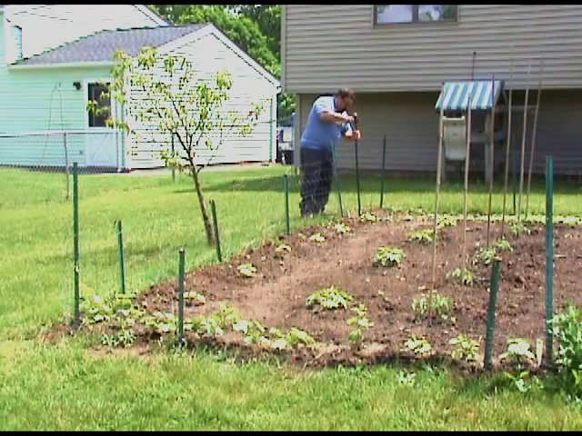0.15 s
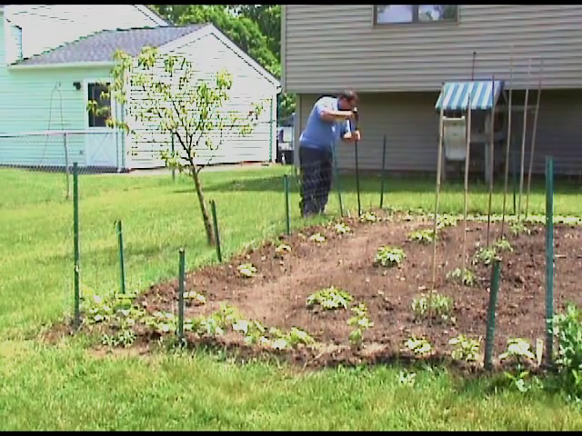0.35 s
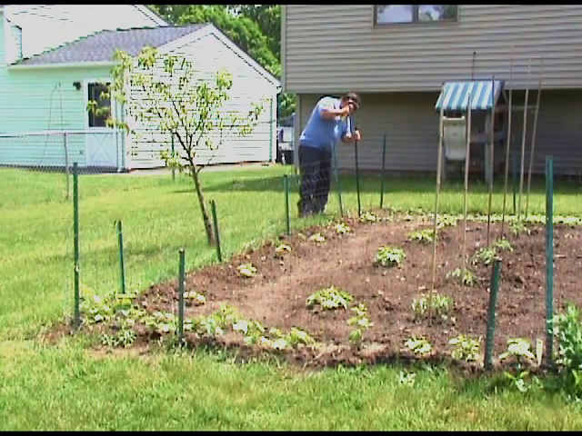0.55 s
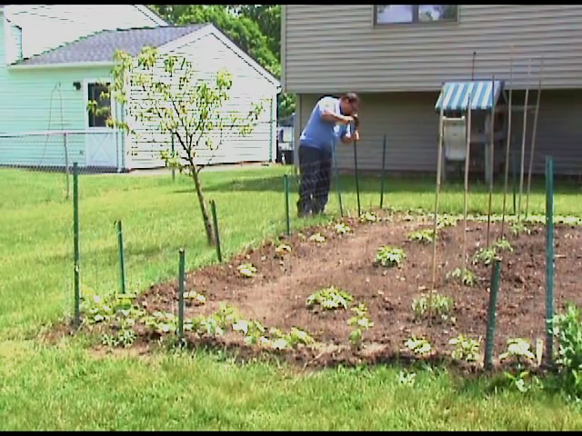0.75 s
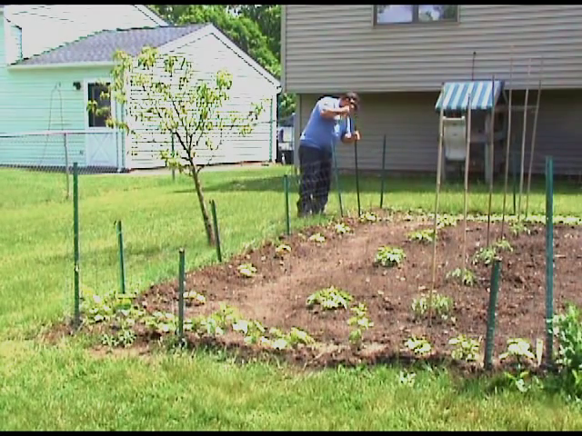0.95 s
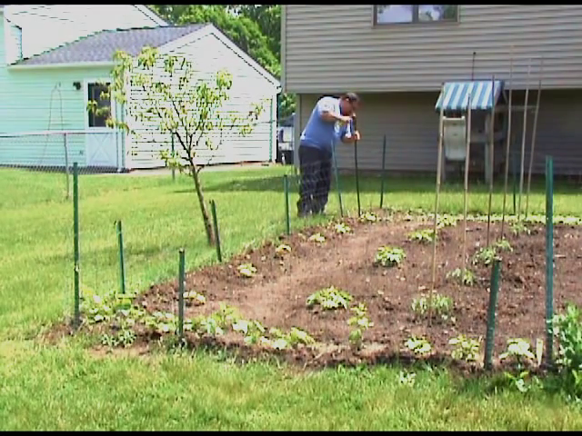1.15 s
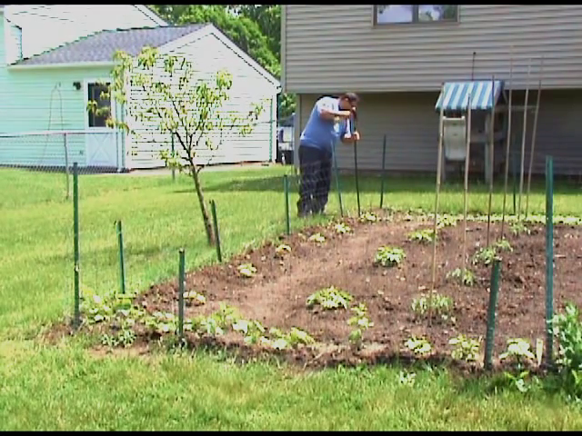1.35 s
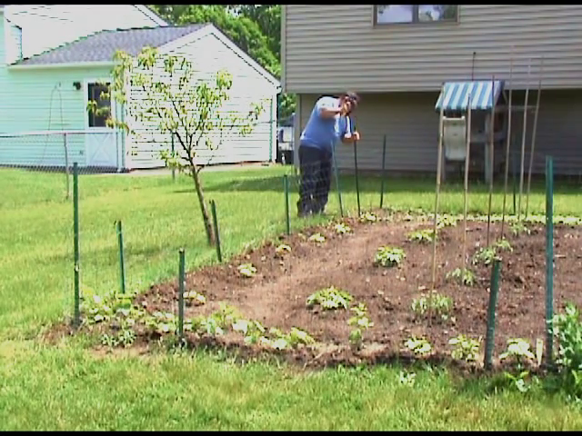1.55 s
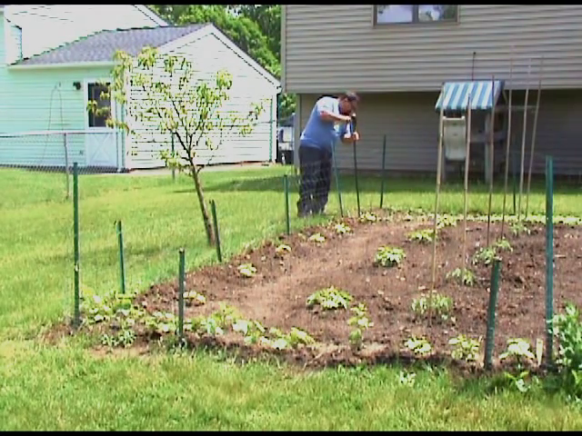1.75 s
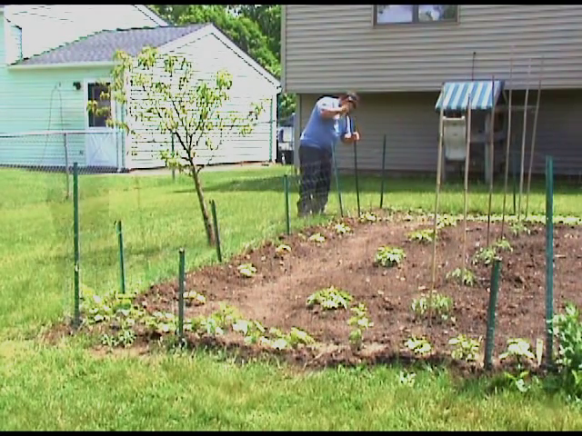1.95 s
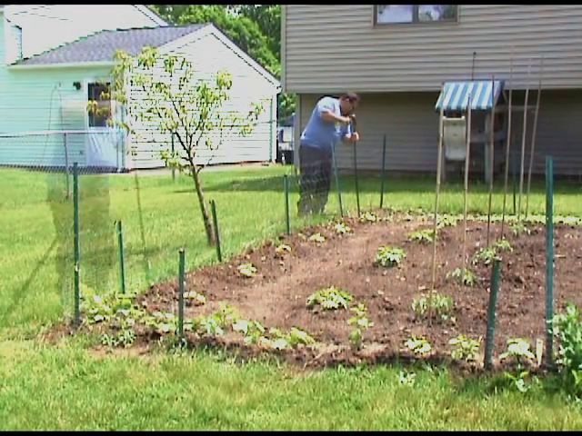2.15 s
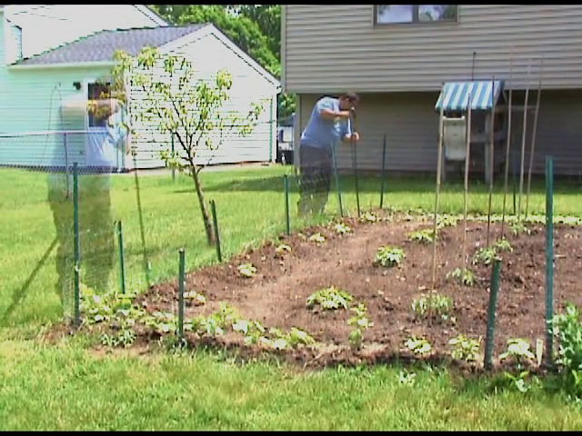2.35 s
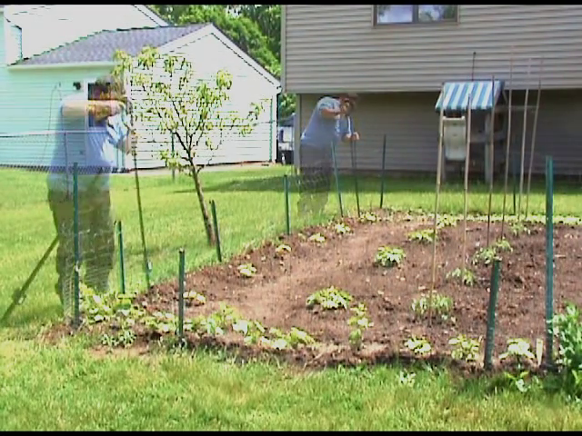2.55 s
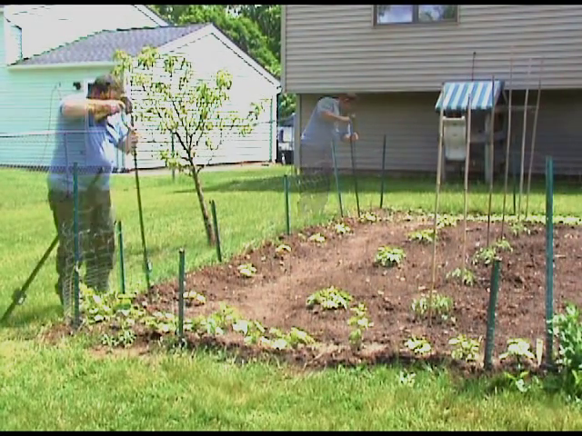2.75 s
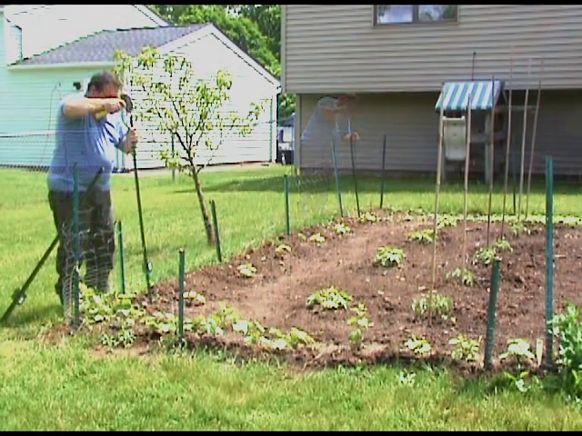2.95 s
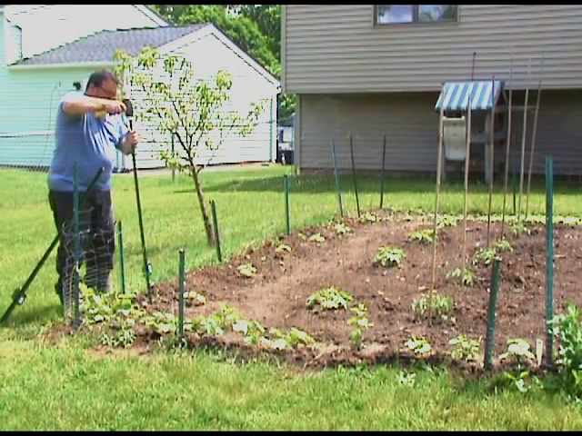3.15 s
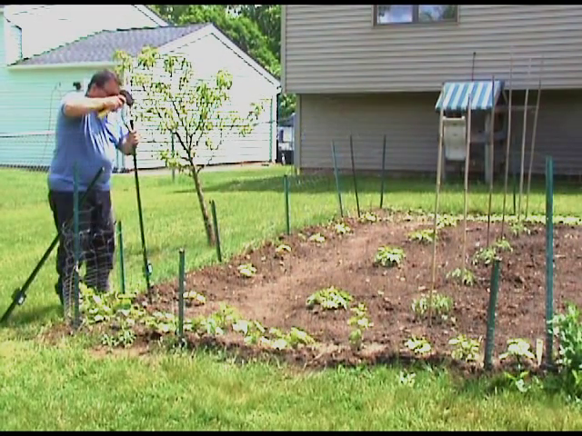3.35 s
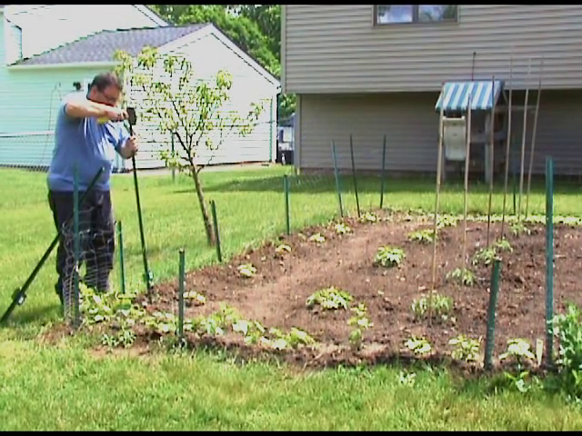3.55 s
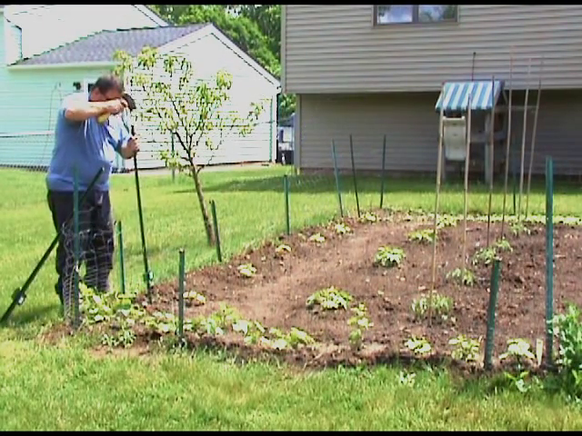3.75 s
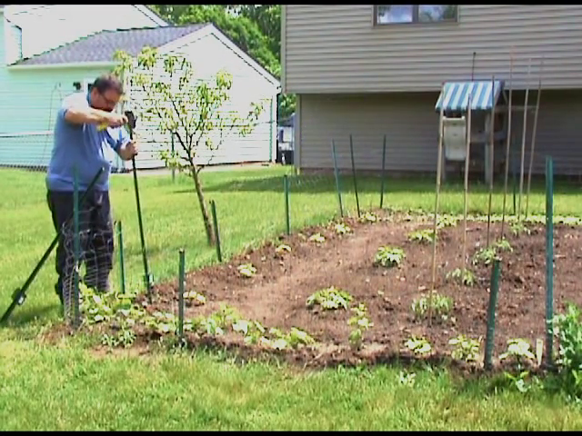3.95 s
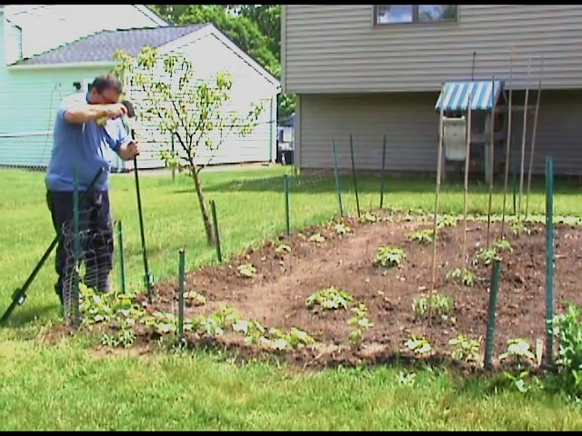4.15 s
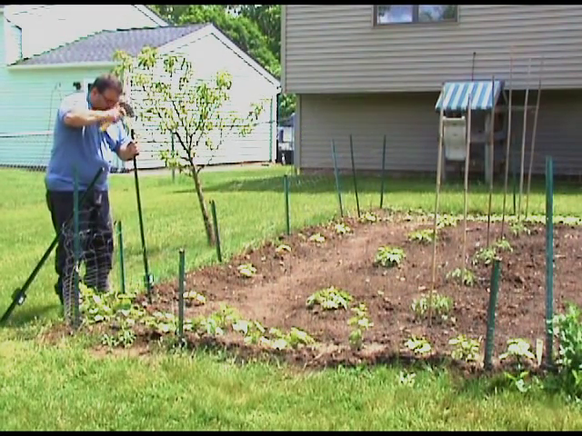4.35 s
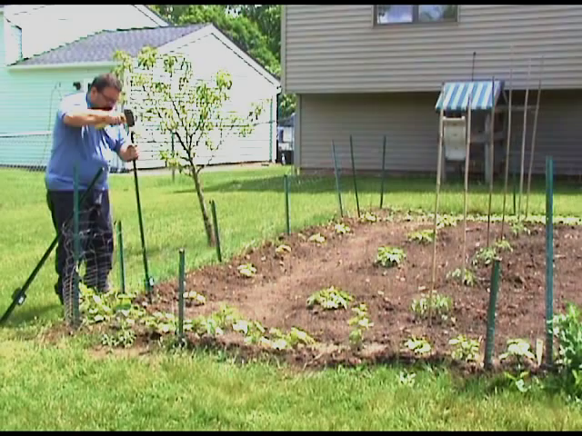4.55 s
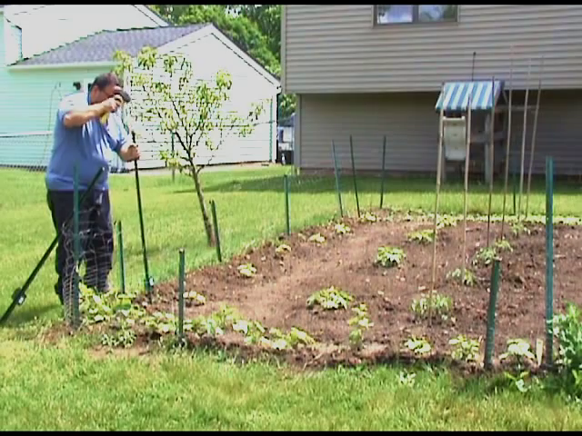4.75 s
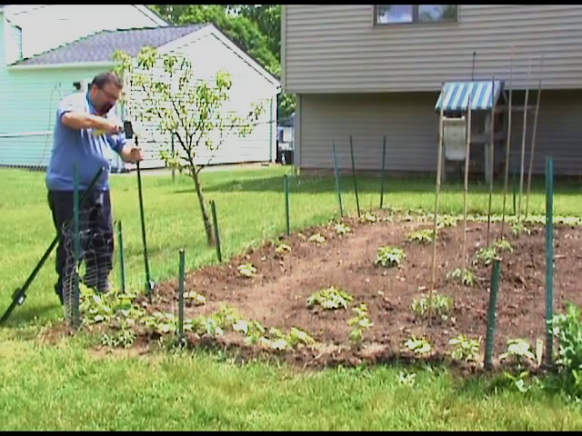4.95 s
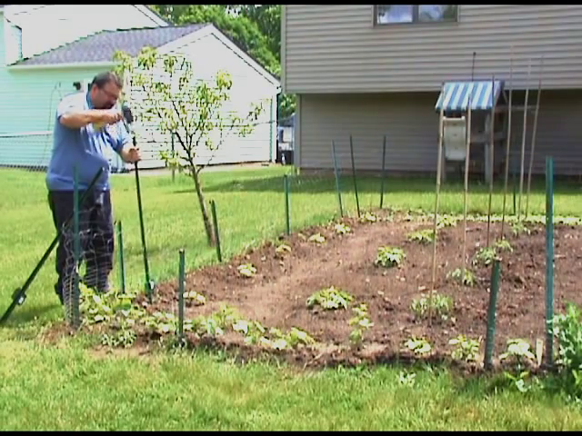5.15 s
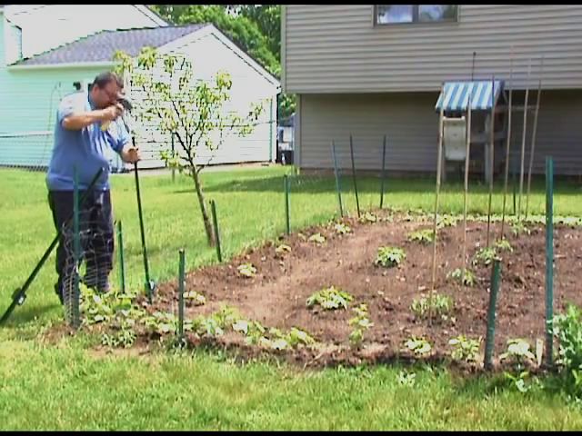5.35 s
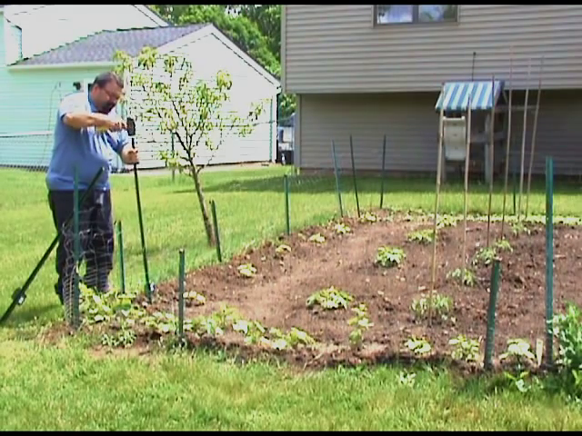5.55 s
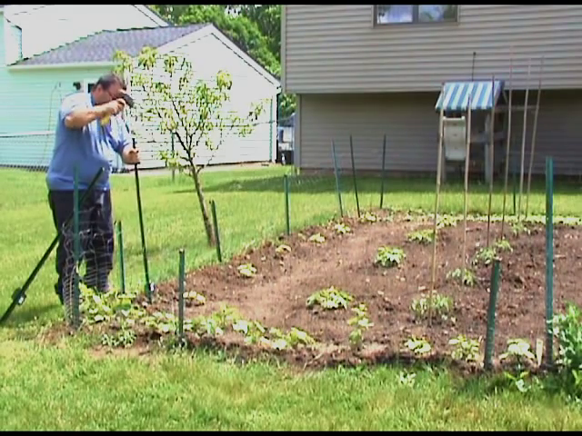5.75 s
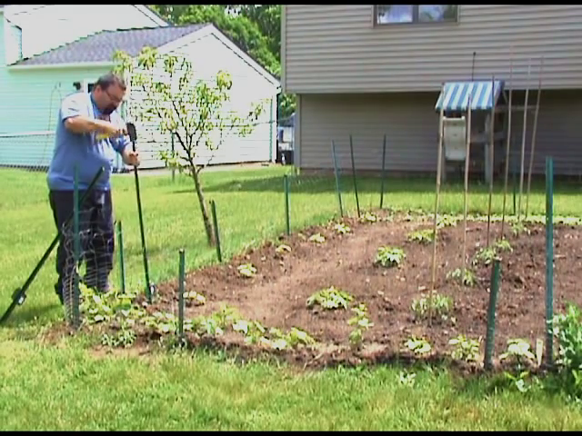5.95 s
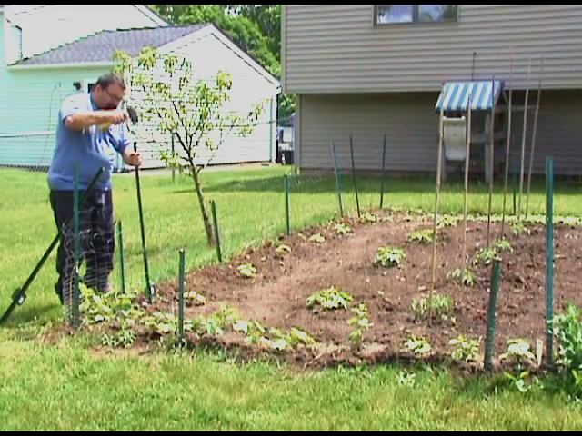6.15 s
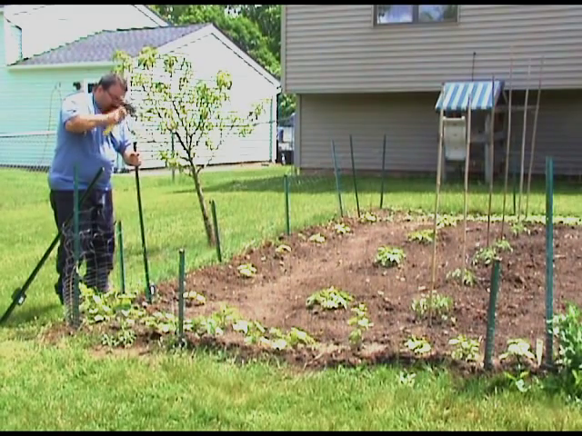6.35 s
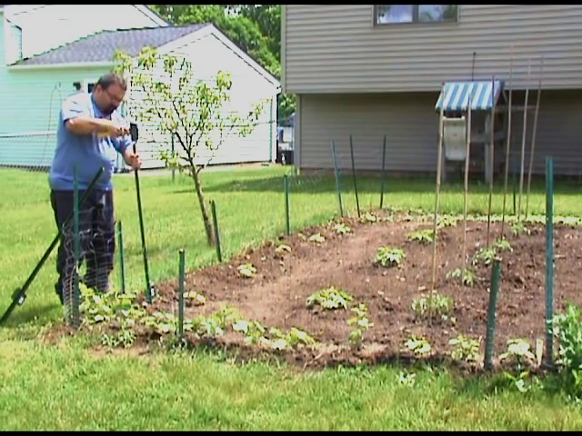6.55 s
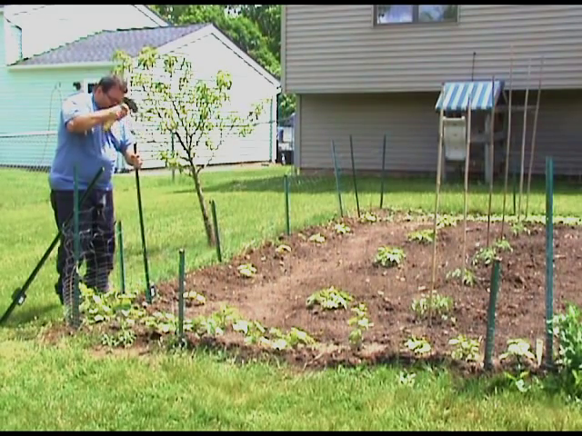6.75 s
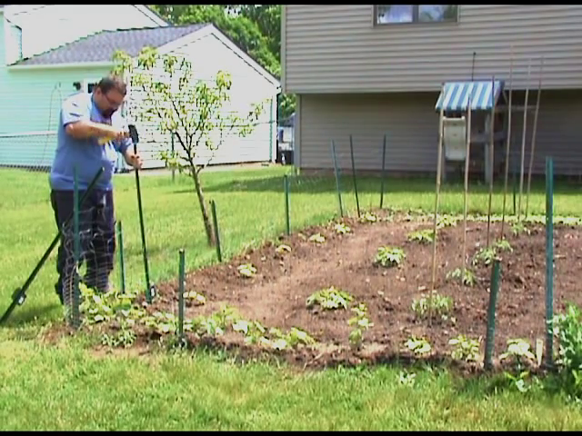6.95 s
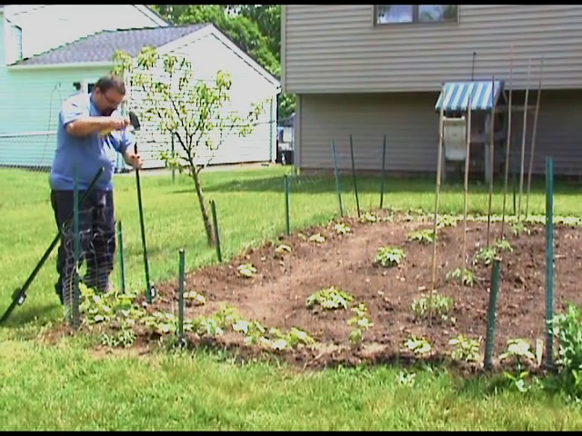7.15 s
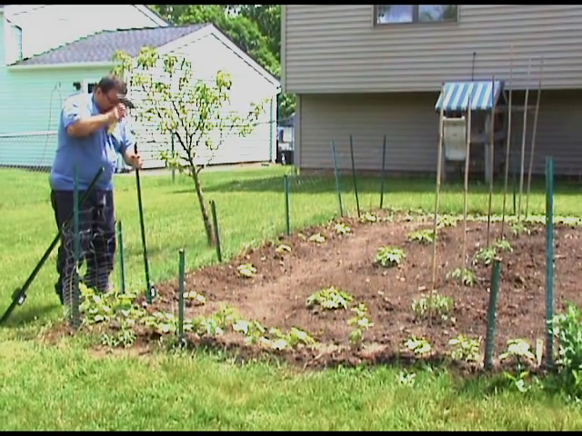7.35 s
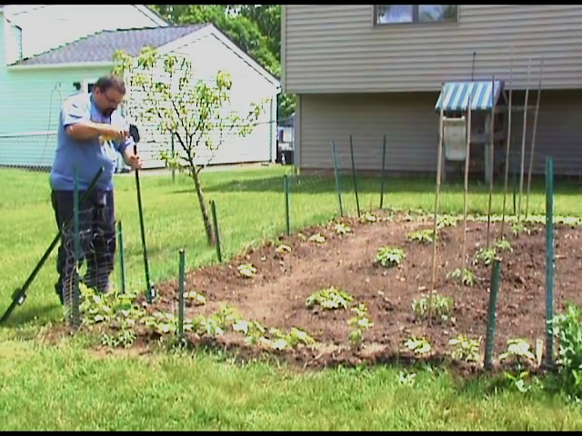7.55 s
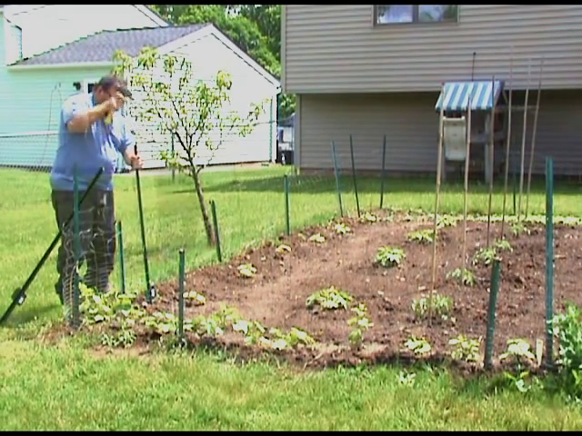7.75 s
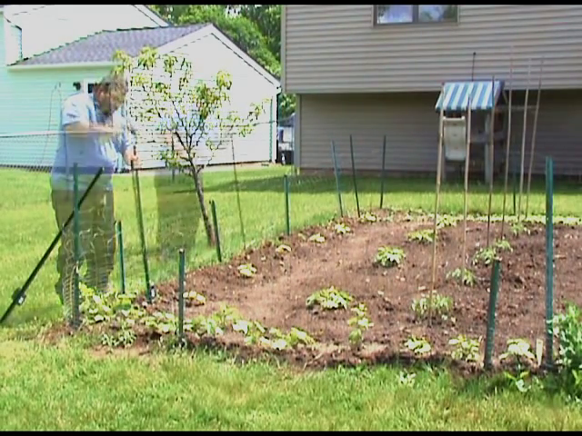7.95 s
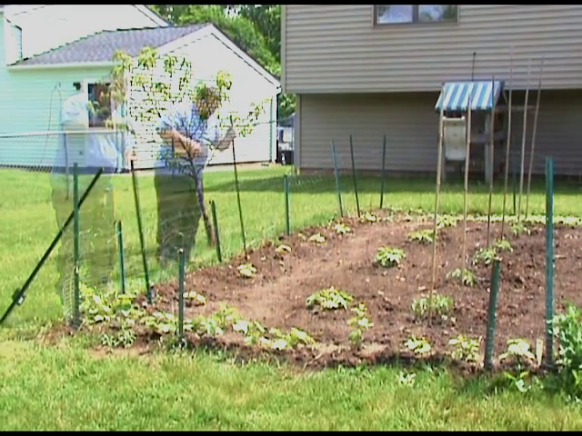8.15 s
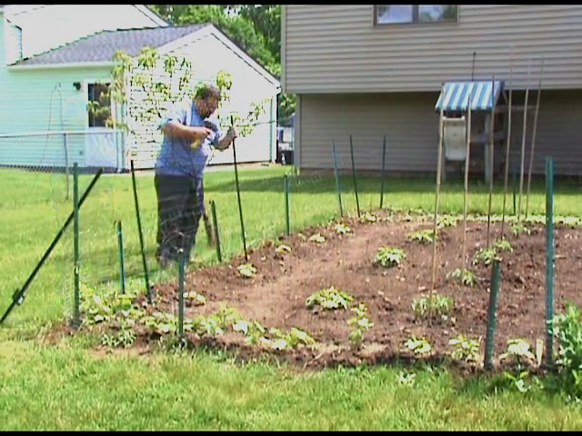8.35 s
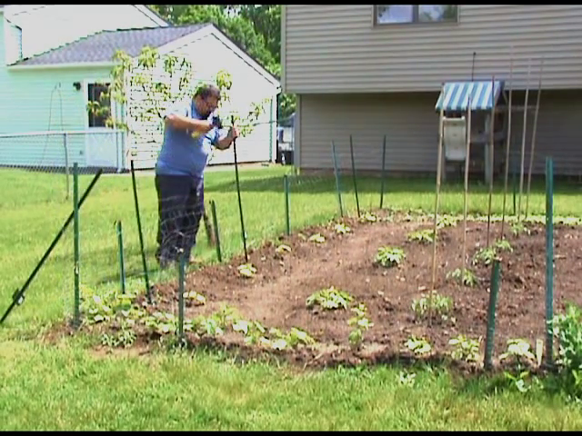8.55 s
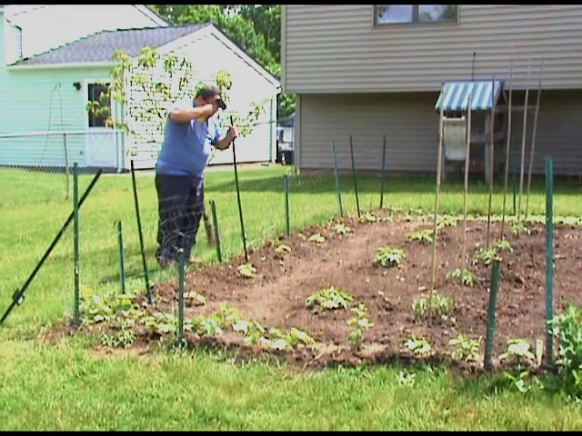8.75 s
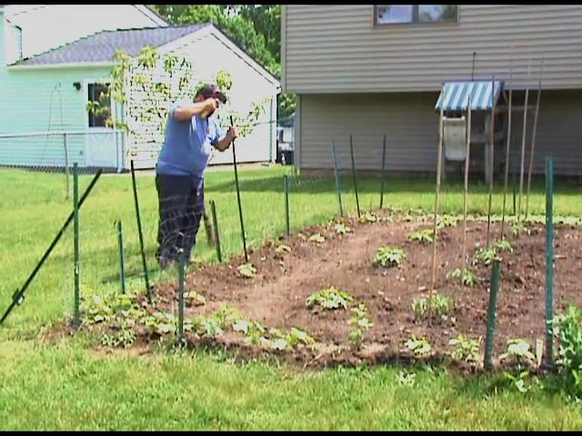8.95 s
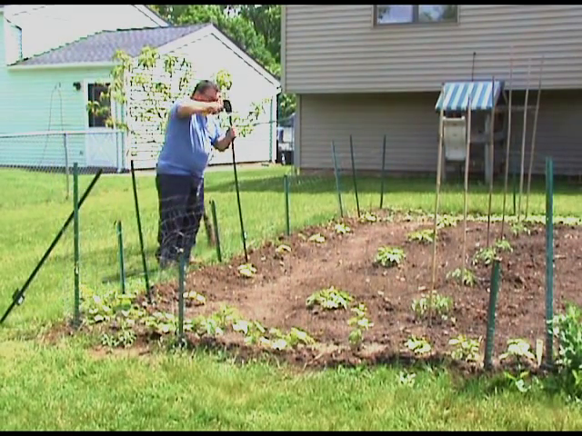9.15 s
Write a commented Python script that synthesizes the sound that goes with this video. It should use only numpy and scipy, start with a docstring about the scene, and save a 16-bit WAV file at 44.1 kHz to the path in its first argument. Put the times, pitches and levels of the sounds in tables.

```python
"""Hammering steel fence posts

A hammer drives two steel posts into garden soil, first a far one, then a near one, their blows overlapping.
Each blow is noise chattering through the post's short modes, a longer ring of the hammer head and a soil thud;
house walls answer with smeared slaps and a noise tail. Gliding sine whistles of a small bird, a wavering motor hum,
wind rumble on the microphone and flickering bands of suburb noise lie around it."""
import sys
import numpy as np
from scipy import signal
from scipy.fft import rfft, irfft
from scipy.io import wavfile
from scipy.ndimage import uniform_filter1d

SR = 44100
rng = np.random.default_rng(int(sys.argv[2]) if len(sys.argv) > 2 else 0)


def makeup_ratio(level_db):
    """Linear amplitude ratio for a level in decibels (20 dB per factor of ten)."""
    decades = np.asarray(level_db, float) / 20
    return 10 ** decades


def wrap_up_sound(samples):
    """Save the sound to the file named by the first command line argument, as 16-bit audio."""
    columns = np.atleast_2d(samples).T
    # keep every value between -1 and 1, then stretch to whole-number steps
    tamed = np.clip(columns, -1, 1)
    steps = np.round(tamed * 32767).astype(np.int16)
    wavfile.write(sys.argv[1], SR, steps)


N = 405719

EARLIER_S = -.194  # a blow just gone, still echoing
# Blows, one list a post, far then near; the first starts at EARLIER_S.
# Each row: time in seconds, level of the clank in dB, then against it in dB: head ring, low clank, high clank.
POST_BLOWS = [
    [(EARLIER_S, -4, -12.5, -6, -20), (0.3107, -4.5, -14.5, -12.5, -18.5), (0.8145, -8, -24, -11.5, -23),
     (1.3174, -4.5, -20, -9.5, -16), (1.8138, -4.5, -22, -23, -19), (2.3042, -5, -17, -11, -19),
     (2.804, -10.5, -19, -15, -23), (3.2949, -17, -24, -4, -13)],
    [(3.1567, -19.5, -9, -9, -21), (3.5862, -7.5, -11.5, -4.5, -17), (4.0527, -3.5, -13, -12.5, -19),
     (4.5426, -4, -9.5, -10, -16), (5.0479, -1.5, -8, -11, -18), (5.5787, -2.5, -7, -5.5, -18),
     (6.0711, 0, -10.5, -17, -18), (6.5675, -0.5, -13.5, -14, -12.5), (7.0784, -4.5, -16, -3.5, -11.5),
     (7.5857, -1.5, -19, -8.5, -10.5), (8.1105, -5, -22, -10, -11.5)],
]
# Modes of the steel post. Each row: frequency in Hz, size in dB against the other modes.
POST_MODES = [(980, 5.5), (1480, 9), (1900, 7), (2070, 10.5), (2540, 7.5), (2880, 9.5), (3460, 7.5),
              (3770, -12), (4480, -28), (4860, -6), (5140, 3), (5600, -19), (5850, 9), (6270, -31),
              (6800, -14), (7600, 9), (8350, 5.5), (8850, 12), (9600, -10), (10400, -18), (12600, -42)]
# Modes of the hammer head. Each row: frequency in Hz, size in dB against the others,
# t60 in seconds before the bounce stretches or shortens it.
HEAD_MODES = [(4130, 0, .2), (4134, -22, .85), (4146, -17, .4), (4220, -16, .08)]
# Wall slaps, one list a post. Each row: delay in seconds, level in dB, smear in seconds, left minus right in dB.
WALL_SLAPS = [
    [(.0006, -29, .005, 29), (.030, 0, .009, -0.5), (.065, -15, 0.0031, 9), (.088, -27, 0.0057, -3),
     (.115, -32, 0.0017, 6), (.211, -14, 0.005, 4), (.25, -37, 0.0073, 17), (.298, -20.5, 0.014, -4)],
    [(.0006, -9.5, .005, 6), (.054, -6.5, 0.0094, -3.5), (.108, -24.5, .006, 6.5),
     (.137, -22, 0.0044, 12.5), (.168, -25, 0.0026, 1.5), (.21, -12.5, 0.005, 3),
     (.298, -27.5, 0.0026, -11.5)],
]
# Where each post stands. Each row: left minus right in dB, yard tail in dB before a fixed trim, tail t60 in seconds.
POST_PLACES = [(.2, -24, 1.11), (1.199, -26, 1.082)]
# Colour of a blow toward the walls. Each row: frequency in Hz, gain in dB.
WALLWARD_COLOUR = [(700, 2.5), (2500, 0.5), (4500, 0.5), (6500, 5.5), (9000, 2.5), (12000, -5.5)]
# Bird syllables. Each row: start in seconds, length in seconds, first pitch in Hz, last pitch in Hz,
# level in dB before flutter and blur.
BIRD_SYLLABLES = [(3.797, .013, 3100, 3550, -44), (3.827, .013, 3230, 3620, -48),
                  (3.853, .008, 3550, 3180, -45), (6.914, .008, 4300, 5300, -40),
                  (6.927, .009, 4260, 3700, -43), (6.936, .015, 3600, 5500, -41),
                  (6.951, .012, 5500, 3300, -42), (6.962, .011, 3180, 3520, -41),
                  (6.972, .008, 4040, 4430, -40), (6.995, .009, 3250, 3700, -43),
                  (8.418, .03, 4150, 3700, -56), (8.45, .012, 3750, 4050, -53),
                  (8.475, .015, 3200, 3150, -56), (8.535, .012, 3500, 3400, -57),
                  (8.555, .03, 3300, 2950, -56)]
# Swell and sinking of the motor hum, gone after the far post. Each row: time in seconds, level in dB before its wander.
HUM_LEVEL = [(0.0, -43), (0.3, -43), (0.42, -53), (0.56, -50), (0.68, -45), (1.3, -48), (1.6, -53),
             (2.0, -53), (2.2, -45), (2.7, -53), (3.1, -58), (3.5, -78)]
# Wind strength. Each row: time in seconds, level in dB before the gusts.
WIND_LEVEL = [(0.0, -50), (1.6, -51), (2.6, -49), (2.97, -45), (3.3, -50), (4.0, -53), (5.3, -52),
              (5.55, -45.5), (6.2, -51), (6.8, -50), (7.25, -44), (7.6, -46), (8.35, -42), (8.6, -50),
              (9.2, -54)]
# Suburb spectrum. Each row: frequency in Hz, relative density in dB per Hz.
SUBURB_COLOUR = [(150, -31), (250, 1), (315, -46.5), (431, -21), (600, 0), (757, -2.5), (1160, 1.5),
                 (2840, -16), (6080, -26), (13000, -30)]
# Suburb width. Each row: frequency in Hz, side minus mid in dB.
SUBURB_SPREAD = [(250, -20), (700, -8), (2400, -4.5), (9000, -8.5)]
# Suburb loudness. Each row: time in seconds, level of the 500-1045 Hz part in dB.
SUBURB_LOUDNESS = [(0.0, -53), (1.7, -54), (3.5, -50), (4.7, -51), (6.5, -50), (7.6, -50), (8.6, -52),
                   (9.2, -51)]

POST_T60_S, MODE_SCATTER_DB = .022, 1.5
CHATTER_DB, CHATTER_T60_S = 1.5, .051  # raw chatter against the ringing post
CRACK_RING_DB, RISE_S = -21., .0025  # modes under the crack; first touch to peak
# a dead blow goes into the soil; a head that rings above DEAD_RING_DB has bounced off and thuds less
THUD_DB, DEAD_RING_DB, THUD_LOSS_PER_DB = -17.5, -15, 5.5
THUD_S, THUD_LAG_S = .0008, .005  # push on the soil; its lag behind the clank
THUD_ECHO_DB = -5  # on top of the first wall slap's level
AIR_S = .18  # long paths lose their treble in this time
SYLLABLE_EDGE_S, BIRD_BLUR_DB = .0015, -29
HUM_HZ = 58
GUST_DB, WIND_SIDE_DB = 2.2, -6.5
# power share of the upper rumble in calm wind; how much of it each dB above calm takes away
UPPER_SHARE, SINK_PER_DB, CALM_DB = .68, .035, -52
CEILING, MIC_TOP_HZ = 1.1, 14600
LEFT_RIGHT = np.array([[1], [-1]])


def curve(rows):
    """Columns of a table, joined by straight lines at every sample."""
    s, *columns = np.transpose(rows)
    return [np.interp(np.arange(N) / SR, s, column) for column in columns]


def band(x, lo_hz, hi_hz, order=2):
    """Band-pass."""
    return signal.sosfilt(signal.butter(order, [lo_hz, hi_hz], "band", fs=SR, output="sos"), x)


def unit(x):
    """Scales to peak 1."""
    return x / np.abs(x).max()


def walk(rate):
    """Smooth random level: a new draw rate times a second, slewed twice, spread a little under 1."""
    hold = int(SR / rate)
    steps = np.repeat(rng.standard_normal(N // hold + 1), hold)
    slewed = uniform_filter1d(uniform_filter1d(steps, hold), hold)
    return 1.156 * slewed[:N]


def shade(x, points):
    """Smooth colour through (Hz, dB) points, one ms late."""
    hz, db = np.transpose(points)
    log_hz = np.log(1 + np.fft.rfftfreq(len(x), 1 / SR))
    gain = makeup_ratio(np.interp(log_hz, np.log(hz), db))
    return np.roll(irfft(rfft(x) * gain, len(x)), SR // 1000)


def modes(table, seconds, detune):
    """Decaying sines; every blow lands elsewhere, so sizes, phases and pitches change."""
    hz, db, t60 = np.transpose(table)[:, :, None]
    size_chance, pitch_chance, phase_chance = rng.standard_normal((3, len(table), 1))
    t = np.arange(int(seconds * SR)) / SR
    phase = 2 * np.pi * (hz * (1 + detune * pitch_chance) * t + phase_chance)
    envelope = makeup_ratio(db + MODE_SCATTER_DB * size_chance - 60 * t / t60)
    return np.sum(envelope * np.sin(phase), axis=0)


def post_clank(t, low_db, high_db):
    """Steel chatters on steel and rings the post: the clank itself, and the crack thrown toward the walls."""
    colour = [(250, low_db - 31), (700, low_db - 8), (1400, low_db - 6.5), (2100, low_db),
              (3000, low_db / 2 - 6), (4500, 0), (6000, high_db / 2 - 4), (8500, high_db),
              (11500, high_db - 5), (14500, high_db - 18), (16000, -100.5)]
    # hand and soil damp the post within a few dozen cycles
    ringing = modes([(hz, db, POST_T60_S) for hz, db in POST_MODES], .12, detune=.012)
    chatter = rng.standard_normal(len(t)) * (1 - np.exp(-t / .0016)) * makeup_ratio(-60 * t / CHATTER_T60_S)
    clank = unit(signal.fftconvolve(chatter, ringing)[:len(t)]) + makeup_ratio(CHATTER_DB) * unit(chatter)
    crack = (t == 0) + makeup_ratio(CRACK_RING_DB) * unit(ringing)
    wallward = unit(shade(shade(crack, colour), WALLWARD_COLOUR))
    return unit(shade(clank, colour)), makeup_ratio(6.5) * wallward


def head_ring(t, db, ring_db):
    """The hammer head's modes beat; a clean, hard blow lets the head bounce free and ring longer."""
    stretch = makeup_ratio(.13 * (db + ring_db + 12))
    table = [(hz, size_db, stretch * t60) for hz, size_db, t60 in HEAD_MODES]
    ringing = modes(table, .8, detune=.00068) * (1 - np.exp(-t / .0024))
    return makeup_ratio(ring_db) * unit(ringing)


def soil_thud(t, ring_db, wall_s, wall_db):
    """The post's short, rough push on the soil gives a low thud, echoed once by the first wall."""
    thud_db = THUD_DB - THUD_LOSS_PER_DB * max(ring_db - DEAD_RING_DB, 0)
    push = (1 + .4 * rng.standard_normal(len(t))) * t * np.exp(-t / THUD_S)
    body = unit(band(push, 85, 480) + .8 * band(push, 95, 170, order=1))
    thud = makeup_ratio(thud_db) * np.roll(body, int(THUD_LAG_S * SR))
    return thud + makeup_ratio(THUD_ECHO_DB + wall_db) * np.roll(thud, int(wall_s * SR))


def blow(db, ring_db, low_db, high_db, wall_s, wall_db):
    """Clank, head ring and thud. Row 0 goes to the microphone; row 1, mostly the crack, goes to the walls."""
    t = np.arange(int(.8 * SR)) / SR
    short = t[:int(.12 * SR)]
    clank, wallward = post_clank(short, low_db, high_db)
    ring = head_ring(t, db, ring_db)
    out = np.array([ring, makeup_ratio(-14) * ring])
    out[0, :len(short)] += clank + soil_thud(short, ring_db, wall_s, wall_db)
    out[1, :len(short)] += wallward
    return makeup_ratio(db) * out


def yard(slaps, tail_db, t60):
    """Two-ear response: smeared slaps off walls and a scattered tail, all duller with distance."""
    t = np.arange(int(.9 * SR)) / SR
    shared, own = rng.standard_normal(len(t)), rng.standard_normal((2, len(t)))
    # the camera body scatters the first 10 ms unlike to each port
    grain = .63 * shared + np.where(t < .01, 1.2, .3) * own
    size = makeup_ratio(tail_db - 12.5 - 60 * t / t60) * (1 - np.exp(-t / .01)) * np.ones((2, 1))
    size = size * makeup_ratio(3.0 * walk(117.4)[:len(t)])  # fences, sheds and trees return it in lumps
    for delay, db, smear, side_db in slaps:
        late = np.maximum(t - delay, 0)
        shape = (1 - np.exp(-late / .0004)) * np.exp(-late / smear)
        shape = shape * np.sqrt(2 / (smear * SR))  # about equal energy at any smear
        size = size + makeup_ratio(db + side_db * LEFT_RIGHT / 2) * shape
    echoes = grain * size
    dull = signal.sosfilt(signal.butter(2, 5500, fs=SR, output="sos"), echoes)
    bright_share = np.exp(-t / AIR_S)
    mixed = bright_share * echoes + (1 - bright_share) * dull
    return signal.sosfilt(signal.butter(1, 900, "high", fs=SR, output="sos"), mixed)


def hammering():
    """Each post's blows in a row, heard straight and by its own paths in the yard."""
    out = 0
    for blows, slaps, (pan_db, tail_db, t60) in zip(POST_BLOWS, WALL_SLAPS, POST_PLACES):
        line = np.zeros((2, N + 2 * SR))  # one second of lead-in for the earlier blow
        wall_s, wall_db = slaps[1][:2]
        for s, *levels in blows:
            sound = blow(*levels, wall_s, wall_db)
            start = int((1 + s - RISE_S) * SR)
            line[:, start:start + sound.shape[1]] += sound
        pan = makeup_ratio(pan_db * LEFT_RIGHT / 2)
        echoes = signal.fftconvolve(line[1:], yard(slaps, tail_db, t60), axes=1)
        out = out + pan * (line[0, SR:SR + N] + echoes[:, SR:SR + N])
    return out


def bird():
    """Faint quick whistles, a fluttering sine on a gliding pitch, blurred by nearby walls."""
    whistles, t, flutter = 0, np.arange(N) / SR, makeup_ratio(4.0 * walk(300))
    for s, length, from_hz, to_hz, db in BIRD_SYLLABLES:
        late = np.clip(t - s, 0, length)
        gate = np.clip(np.minimum(late, length - late) / SYLLABLE_EDGE_S, 0, 1)
        mean_hz = from_hz + (to_hz - from_hz) * late / length / 2  # mean pitch since the start
        whistles = whistles + makeup_ratio(db) * flutter * gate * np.sin(2 * np.pi * late * mean_hz)
    blur = makeup_ratio(BIRD_BLUR_DB - 60 * t[:SR // 5] / .25) * rng.standard_normal((2, SR // 5))
    return whistles + signal.fftconvolve(whistles[None], blur, axes=1)[:, :N]


def motor_hum():
    """A motor's low sine, wavering in pitch and level."""
    phase = 2 * np.pi * np.cumsum(HUM_HZ * (1 + .017 * walk(9))) / SR
    return makeup_ratio(curve(HUM_LEVEL)[0] + 1.7 * walk(30)) * np.sqrt(2) * np.sin(phase)


def wind():
    """Wind on the microphone: two bands of rumble in gusts, deeper when strong."""
    wind_db = curve(WIND_LEVEL)[0]
    deep = band(rng.standard_normal((2, N)), 43.2, 115)
    upper = band(rng.standard_normal((2, N)), 90, 180, order=1)
    upper_share = np.clip(UPPER_SHARE - SINK_PER_DB * (wind_db - CALM_DB), 0, 1)
    mid, side = np.sqrt(1 - upper_share) * deep / deep.std() + np.sqrt(upper_share) * upper / upper.std()
    return makeup_ratio(wind_db + GUST_DB * walk(15)) * (mid + makeup_ratio(WIND_SIDE_DB) * side * LEFT_RIGHT)


def suburb():
    """Far traffic and leaves: noise bands half an octave apart that flicker alone, narrow in the lows."""
    out = 0
    for hz in 250 * 2 ** np.arange(0, 5.6, .5):
        mid, side = band(rng.standard_normal((2, N)), hz / 1.375, hz * 1.385)
        db, side_db = [np.interp(np.log(hz), np.log(points[:, 0]), points[:, 1])
                       for points in (np.array(SUBURB_COLOUR), np.array(SUBURB_SPREAD))]
        out = out + makeup_ratio(db + 1.6 * walk(7.1)) * (mid + makeup_ratio(side_db) * side * LEFT_RIGHT)
    out = band(out, 100, 13300, order=6)
    return out / np.std(band(out, 500, 1045)) * makeup_ratio(curve(SUBURB_LOUDNESS)[0])


def scene():
    """Everything at the microphone."""
    return hammering() + bird() + motor_hum() + wind() + suburb()


def roll_off(x):
    """The treble ends steeply here."""
    return signal.sosfilt(signal.butter(12, 15630, fs=SR, output="sos"), x)


def record(dry):
    """A camera microphone rounds the sharpest peaks and loses the top of the treble."""
    rounded = CEILING * np.tanh(dry / CEILING)
    mix = signal.sosfilt(signal.butter(8, MIC_TOP_HZ, fs=SR, output="sos"), rounded)
    return roll_off(mix)


dry = scene()
out = record(dry)
wrap_up_sound(out)
```